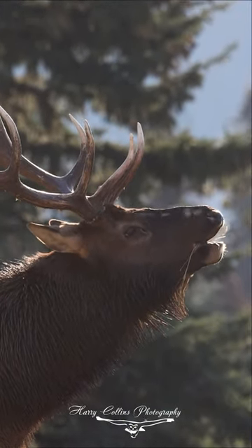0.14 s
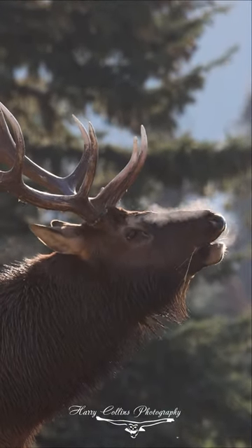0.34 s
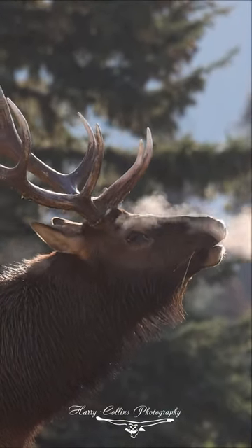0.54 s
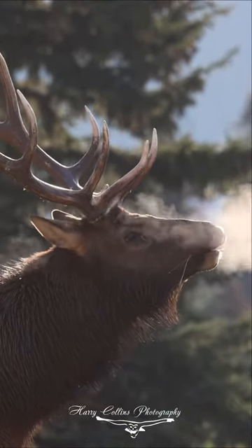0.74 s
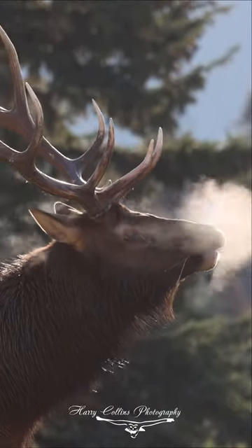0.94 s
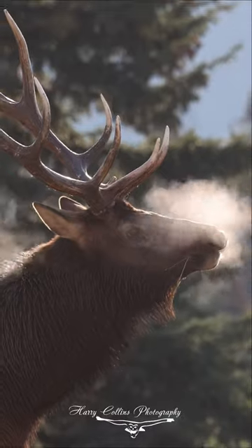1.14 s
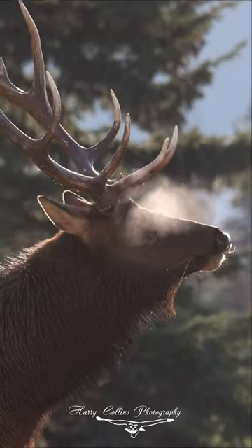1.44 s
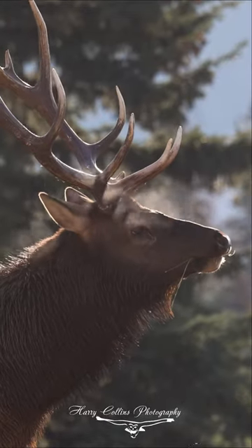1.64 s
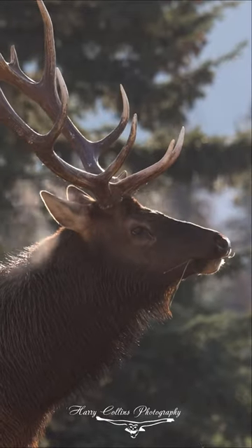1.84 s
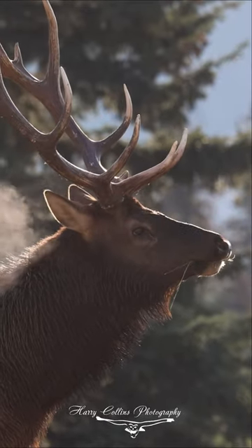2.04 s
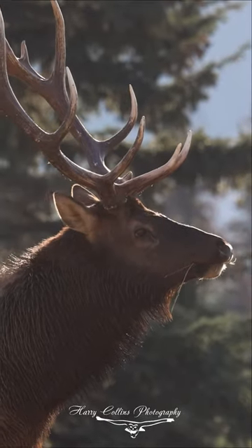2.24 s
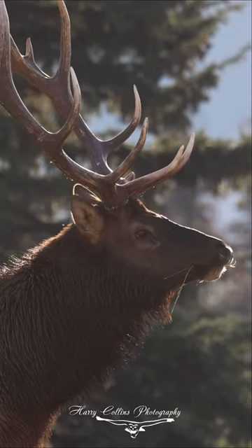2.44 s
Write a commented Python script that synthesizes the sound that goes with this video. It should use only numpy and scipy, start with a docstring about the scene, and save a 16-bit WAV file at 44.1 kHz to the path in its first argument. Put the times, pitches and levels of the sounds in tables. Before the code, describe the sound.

A bull elk ends its bugle with a raspy descending squeal that echoes away outdoors.

```python
"""A quiet clearing, where a bull elk is ending his bugle. The high whistle fades, then breaks into a
rough falling squeal. Under it his vocal folds hum a short, nearly pure low note and pulse the breath
that rasps through his throat. The ground and trees near and far throw the call back. Soft low thuds,
faint ticks and a thin, far trill sit in the hush of the open air."""
import sys
import numpy as np
from scipy import signal
from scipy.fft import rfft, irfft, next_fast_len
from scipy.io import wavfile

SR = 44100
rng = np.random.default_rng(int(sys.argv[2]) if len(sys.argv) > 2 else 0)


def put_to_file(sound):
    """Save the sound as 16-bit audio at rate SR, in the file named by the first command-line argument."""
    columns = np.atleast_2d(sound).T  # one column per channel
    safe = np.clip(columns, -1, 1)
    whole_steps = np.round(safe * 32767)
    wavfile.write(sys.argv[1], SR, whole_steps.astype(np.int16))


N = 114660
PRE_ROLL = SR // 2   # samples before time zero: the bugle is already sounding
T = np.arange(-PRE_ROLL, N) / SR


def amp(db):
    """Decibels to gain."""
    return 10 ** (np.asarray(db) / 20)


def unit(x):
    """Scale to rms 1."""
    return x / np.sqrt(np.mean(x ** 2) + 1e-20)


def curves(rows):
    """Each column after the time, joined by straight lines."""
    times, *columns = np.transpose(rows)
    return [np.interp(T, times, column) for column in columns]


def swell(start, length, db):
    """A rounded envelope: half a sine."""
    return amp(db) * np.sin(np.pi * np.clip((T - start) / length, 0, 1))


def noise():
    """White noise."""
    return rng.standard_normal(len(T))


def filtered(x, order, hz, kind="low"):
    """A low-, high- or band-pass with a flat passband."""
    return signal.sosfilt(signal.butter(order, hz, kind, fs=SR, output="sos"), x)


def wander(rate_hz):
    """Smooth random motion with rms 1."""
    return unit(filtered(noise(), 4, rate_hz))


def resonate(x, hz, width_hz):
    """A steep-sided resonance: two poles, applied twice, at rms 1."""
    r = np.exp(-np.pi * width_hz * np.pi / 2 / SR)
    section = [(1 - r * r) / 2, 0, (r * r - 1) / 2, 1, -2 * r * np.cos(2 * np.pi * hz / SR), r * r]
    return unit(signal.sosfilt([section, section], x))


def eq(x, points):
    """Shape x with a curve through (Hz, dB) points."""
    hz, db = np.transpose(points)
    size = next_fast_len(len(x) + PRE_ROLL)
    bins_hz = np.maximum(np.fft.rfftfreq(size, 1 / SR), 1)
    gain = amp(np.interp(np.log(bins_hz), np.log(hz), db))
    return irfft(rfft(x, size) * gain, size)[:len(x)]


# The tone of the open air, early and late. Each row: frequency in Hz, relative level in dB.
EARLY_HUSH_EQ = [(25, -29.5), (50, -11.5), (90, -0.5), (130, -5.5), (210, -9), (400, -14.5), (700, -15.5),
                 (1300, -19), (2300, -24), (3700, -31.5), (5500, -41), (11500, -44.5), (16000, -60.5)]
LATE_HUSH_EQ = [(15, -56), (25, -28), (38, -13), (58, -19), (75, -4), (97, -2), (139, -8), (210, -7.5),
                (245, -15), (342, -12.5), (503, -15.5), (720, -12), (1330, -23), (3030, -31), (3920, -33.5),
                (5470, -41.5), (11500, -45), (15000, -69), (22000, -120)]

def hush():
    """The bed: a distant rush and a thin top hiss, crossfading to a little fuller in the second half."""
    crossfade_s = (1.42, 1.49)
    blend = np.interp(T, crossfade_s, [0, 1])
    hiss = amp(np.interp(T, crossfade_s, [-80, -74.5])) * unit(filtered(noise(), 12, 12290, "high"))
    early = amp(-59.5) * unit(eq(noise(), EARLY_HUSH_EQ))
    late = amp(-58) * unit(eq(noise(), LATE_HUSH_EQ))
    return np.sqrt(1 - blend) * early + np.sqrt(blend) * late + hiss


def far_trill():
    """Nine quick, thin pips of narrow noise over a soft buzz."""
    starts, pip_s = .553 + .0665 * np.arange(9), .022
    sounding = (T > starts[0]) & (T < starts[-1] + pip_s)
    buzz = amp(-73) * sounding * resonate(noise(), hz=3340, width_hz=460)
    pips = sum(swell(start, pip_s, db=-77) for start in starts)
    return buzz + pips * resonate(noise(), hz=4750, width_hz=640)


# Ticks after the call. Each row: start in seconds, length in seconds, level in dB, pitch in Hz.
FAINT_TICKS = [(1.455, .016, -71.5, 3920), (1.664, .016, -72.5, 3850), (1.865, .02, -77, 3800),
               (2.027, 0.023, -69, 3860), (2.239, 0.019, -69, 3600), (2.383, .035, -71, 3880)]

def ticks():
    """Tiny puffs of noise, each a bright band with a weaker, lower one."""
    grain, track = noise(), 0
    for start, length, db, hz in FAINT_TICKS:
        upper = resonate(grain, hz, width_hz=305)
        lower = amp(-4.5) * resonate(grain, .682 * hz, width_hz=305)
        track += swell(start, length, db) * (upper + lower)
    return track


# Low thuds. Each row: start in seconds, length in seconds, level in dB, pitch in Hz.
SOFT_THUDS = [(0.36, 0.036, -54, 250.3), (1.097, .12, -51, 87.8), (1.301, 0.11, -54, 87.8),
              (2.022, 0.04, -60, 90), (2.385, 0.028, -56, 90.4)]

def thuds():
    """Round bumps of a low sine, roughened by a little noise at the same pitch."""
    track = 0
    for start, length, db, hz in SOFT_THUDS:
        body = np.sqrt(2) * np.sin(2 * np.pi * hz * T)
        track += swell(start, length, db) * (body + .21 * resonate(noise(), hz, width_hz=62))
    return track


# Scattering surroundings, from the ground and antlers close by to stands of trees far off. Each row: delay in
# seconds, send level in dB, build-up in seconds, # time to die by 60 dB in seconds, bass shelf in dB.
SCATTERERS = [(.005, -13, 0.0017, 0.14, -12), (.03, -13.5, 0.0078, 0.4, -5.5), (.2, -27, .015, 0.39, -8),
              (0.291, -30.5, 0.1, .4, -14), (.48, -40, 0.12, .55, -10.5), (.72, -47.5, 0.065, 1.4, -4)]
# The tone of all their echoes. Each row: frequency in Hz, gain in dB.
TREE_EQ = [(60, -11), (155, -6.5), (400, 6), (900, -5.5), (1300, -2.5), (1800, -7.5), (2350, 5.5),
           (2750, -6.5), (3350, 2.5), (4500, -7.5), (6600, -1.5), (9000, -11.5)]

def tree_echoes(call):
    """Each scatterer, near or far, returns a swelling, dying scatter of small reflections, duller the farther
    off it is."""
    t, response = T - T[0], 0
    for delay, db, rise, t60, bass_db in SCATTERERS:
        age = np.maximum(t - delay, 0)
        scatter = noise() * np.minimum(age / rise, 1) * amp(-60 * age / t60)
        scatter = unit(scatter) / np.sqrt(len(t))   # unit energy
        air_cutoff_hz = min(2540 / np.sqrt(delay), SR / 3)   # the air soaks up treble on the way
        scatter = filtered(scatter, 2, air_cutoff_hz)
        response += amp(db) * eq(scatter, [(200, bass_db), (800, 0)])
    return eq(signal.fftconvolve(call, response)[:len(T)], TREE_EQ)


# Sharp reflections. Each row: delay in seconds, level in dB, low-pass cutoff in Hz.
SLAPS = [(0.028, -17, 1999), (.228, -27.5, 500), (.49, -42.5, 697)]

def slapback(call):
    """The ground and the edge of the wood send back dulled, delayed copies of the call."""
    return sum(amp(db) * np.interp(T - delay, T, filtered(call, 1, hz)) for delay, db, hz in SLAPS)


# The fader on the rasp. Each row: time in seconds, gain in dB.
RASP_FADER = [(.065, -75), (.088, -39.5), (.115, -32), (.16, -33), (.21, -35), (.25, -32.5), (.31, -37.5),
              (.335, -41), (.38, -79.5)]
# Throat resonances. Each row: centre in Hz, width in Hz, relative level in dB with the mouth open,
# the same with it closing.
FORMANTS = [(363.3, 68.7, -25, -45.5), (666, 120, 0.5, -9.5), (980, 120, -2.5, 0), (1338, 140, -10.5, 7.5),
            (1810, 46, -6.5, 3), (2297, 250, -4.5, -1.5), (3220, 470, -2, -7.5), (3680, 200, -16.5, -24.5)]
# Air hissing out of the mouth. Each row: time in seconds, level in dB.
LIP_HISS = [(.07, -86), (.098, -56.5), (.15, -59.5), (.205, -58), (.26, -72.5), (.35, -102)]
# The tone of that hiss. Each row: frequency in Hz, relative level in dB.
LIP_EQ = [(2500, -44.5), (4250, -22), (4750, -5), (5250, -1.5), (6100, -7), (7100, -19), (7600, -16),
          (8200, -29), (11000, -40)]

def rasp(fold_phase):
    """Turbulence pulsed by the folds rings the throat and hisses at the lips."""
    rasp_db, = curves(RASP_FADER)
    hiss_db, = curves(LIP_HISS)
    closing = np.interp(T, (.17, .2), [0, 1])   # the closing mouth rebalances the formants
    breath = noise() * (1 + .27 * np.sin(fold_phase))
    throat = sum(amp(open_db + (closed_db - open_db) * closing) * resonate(breath, hz, width)
                 for hz, width, open_db, closed_db in FORMANTS)
    throat = amp(-5) * filtered(throat, 10, (340, 3620), "band")
    return amp(rasp_db) * throat + amp(hiss_db) * unit(eq(breath, LIP_EQ))


# The whistle's fade and fall. Each row: time in seconds, pitch in Hz, level in dB, roughness from 0 to 1.
WHISTLE_PATH = [(-.3, 3375, -27, .04), (-.16, 3330, -21, 0.1), (-.04, 3350, -29, 0.04),
                (.008, 3310, -31.5, 0), (.024, 3295, -43.5, 0.01), (.07, 3280, -63.5, 0.08),
                (.083, 3235, -32.5, 0.1), (.096, 3170, -24.5, 0), (.106, 2900, -40, 0.25),
                (.13, 2500, -34.5, .2), (.141, 2275, -17, 0.08), (.155, 2235, -17, 0.2),
                (.184, 2190, -21, .4), (.195, 1895, -18, 0.2), (.243, 1800, -26.5, 0.5),
                (.268, 1350, -26.5, .35), (.314, 1290, -28.5, .3), (.332, 1030, -33, 0.42),
                (.345, 855.5, -42, 0.54), (.37, 800, -83, 0)]
# Its shrill edge. Each row: time in seconds, level of the second harmonic in dB.
WHISTLE_EDGE = [(-.1, -47.5), (.01, -57.5), (.05, -62), (.092, -57), (.115, -72), (.15, -84), (.2, -98)]

def whistle(fold_phase):
    """A near sine that loses its overtones at the break, then shakes and frays as it falls."""
    jitter, shimmer_db, flutter_depth, fray_depth = .05, 4.5, .81, 1.6   # at full roughness
    shake_hz, fray_hz = 220, 239
    hz, db, rough = curves(WHISTLE_PATH)
    edge_db, = curves(WHISTLE_EDGE)
    shaken_hz = hz * (1 + jitter * rough * wander(shake_hz))
    phase = 2 * np.pi * np.cumsum(shaken_hz) / SR
    overtones = amp(edge_db) * (np.sin(2 * phase) + amp(-17.5) * np.sin(3 * phase))
    noise_band = wander(fray_hz) * np.sin(phase) + wander(fray_hz) * np.cos(phase)
    fray = fray_depth * rough
    tone = (np.sin(phase) + fray * noise_band) / np.sqrt(1 + 2 * fray ** 2)   # frays at constant power
    level = amp(db + shimmer_db * rough * wander(shake_hz))
    flutter = 1 + flutter_depth * rough * np.sin(fold_phase)   # the folds beat in the whistle
    return np.sqrt(2) * (level * flutter * tone + overtones)


# The low note of the vocal folds. Each row: time in seconds, pitch in Hz, level in dB.
FOLD_NOTE = [(.08, 152, -74.5), (.1, 152, -50.5), (.125, 153, -32.5), (.165, 155, -22), (.2, 156, -16.5),
             (.235, 153, -18.5), (.26, 145, -28), (.285, 135, -44), (.305, 128, -36.5), (.335, 120, -44),
             (.37, 115, -85)]

def elk_bugle():
    """The vocal folds hum a low sine, and their beat pulses both whistle and rasp."""
    hz, db = curves(FOLD_NOTE)
    fold_phase = 2 * np.pi * np.cumsum(hz) / SR
    low_note = np.sqrt(2) * amp(db) * np.sin(fold_phase)
    return low_note + whistle(fold_phase) + rasp(fold_phase)


def scene():
    """The call, its echoes and the background, in mono."""
    call = elk_bugle()
    mix = call + slapback(call) + tree_echoes(call) + thuds() + ticks() + far_trill() + hush()
    return mix[None, PRE_ROLL:]


def record(dry):
    """A 2 ms fade-in and a steep cut of the very top."""
    fade_in = np.sin(np.pi / 2 * np.minimum(T[PRE_ROLL:] / .002, 1)) ** 2
    top_cut = signal.ellip(10, .1, 80, 15750, fs=SR, output="sos")
    return signal.sosfilt(top_cut, dry * fade_in)


dry = scene()
out = record(dry)
put_to_file(out)
```